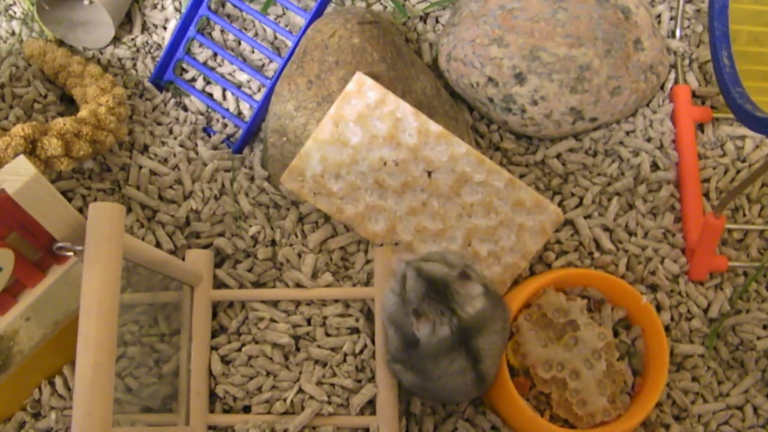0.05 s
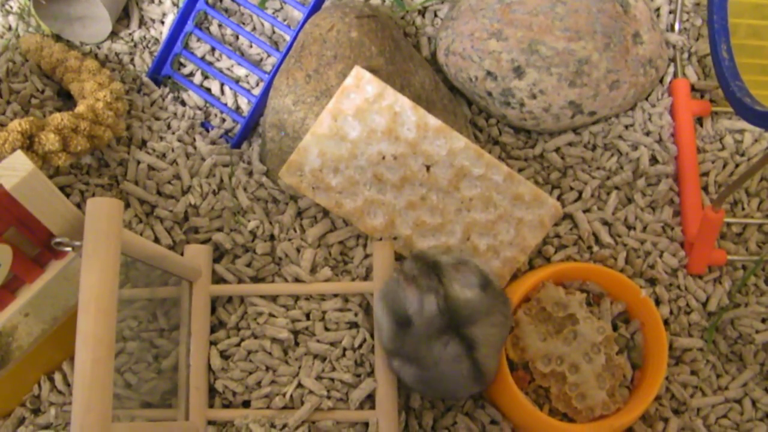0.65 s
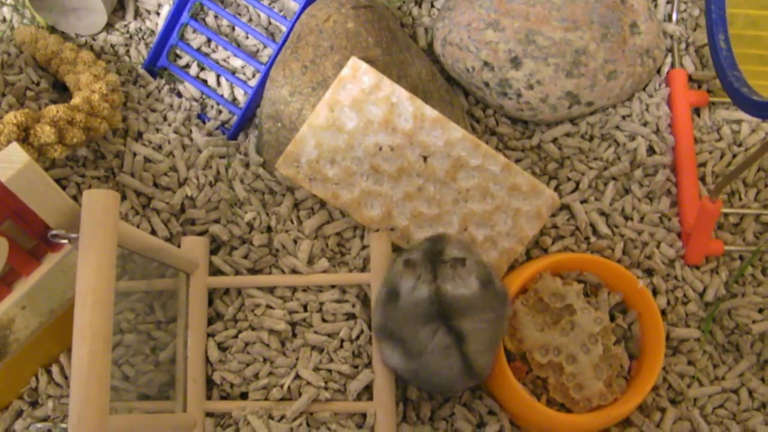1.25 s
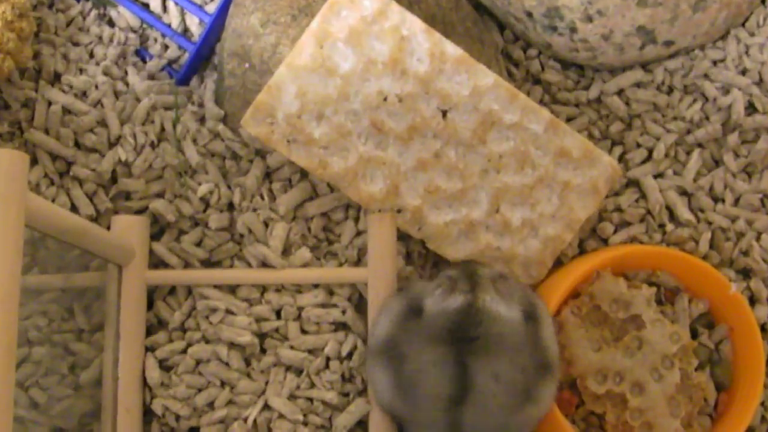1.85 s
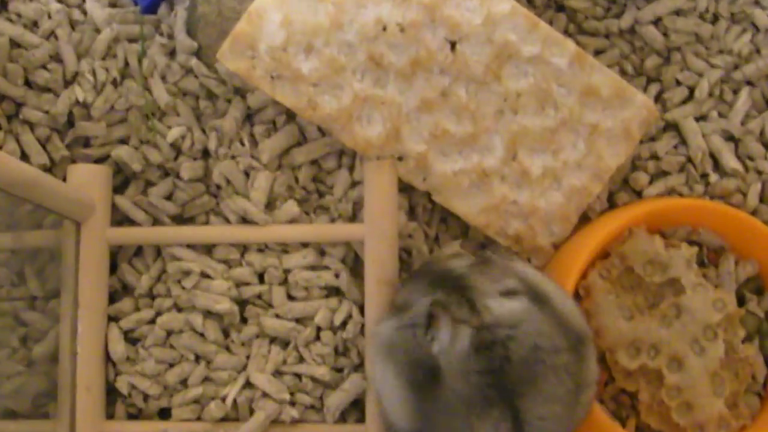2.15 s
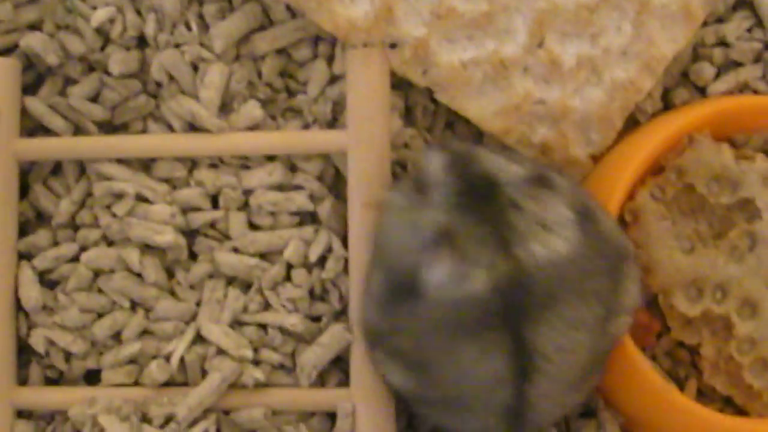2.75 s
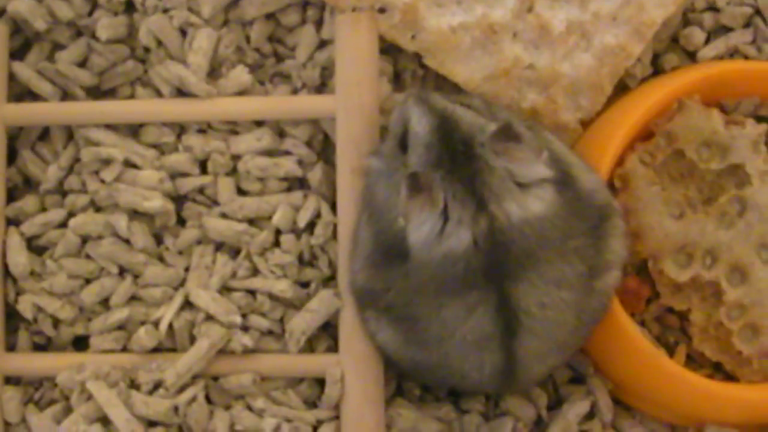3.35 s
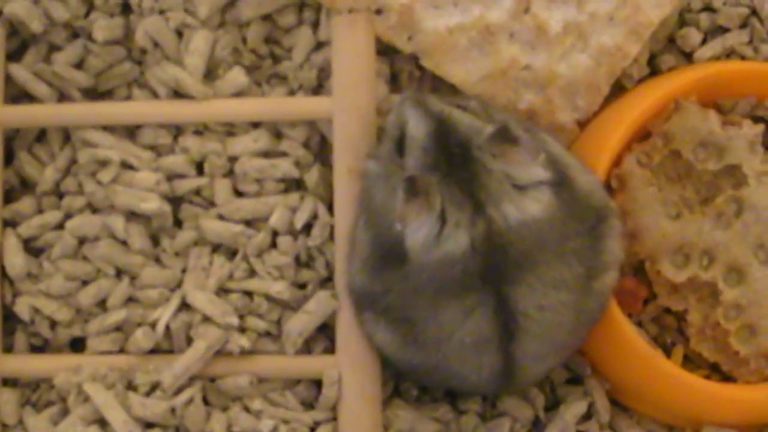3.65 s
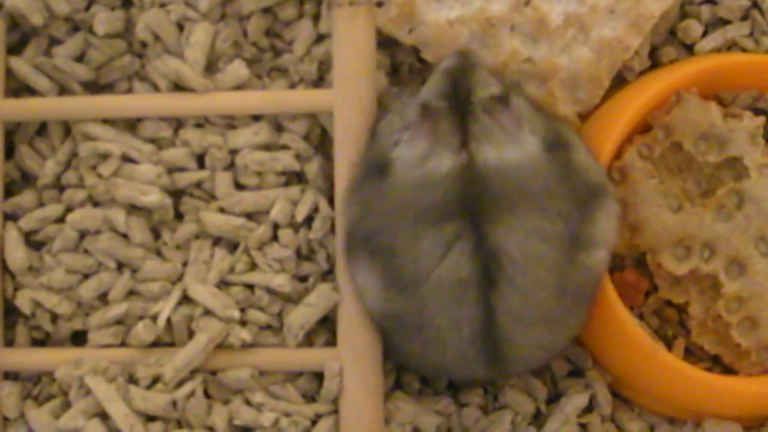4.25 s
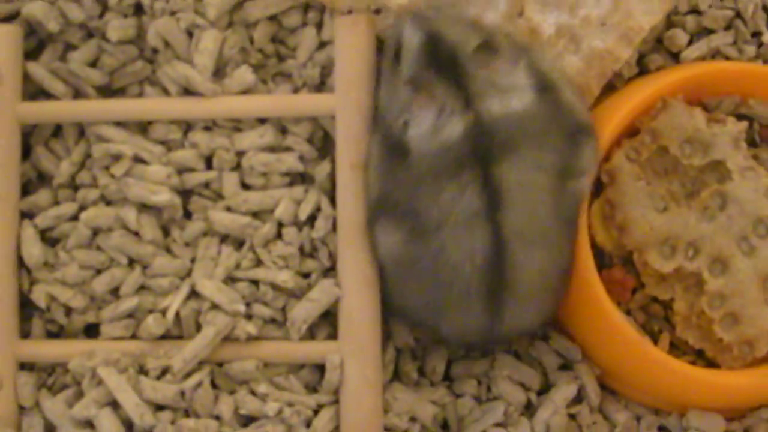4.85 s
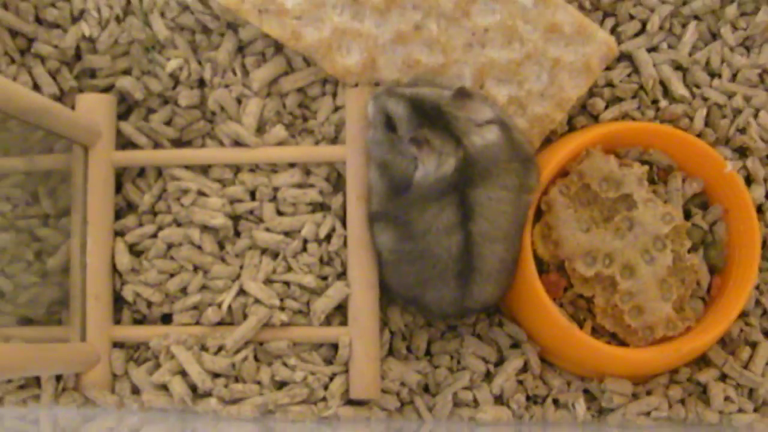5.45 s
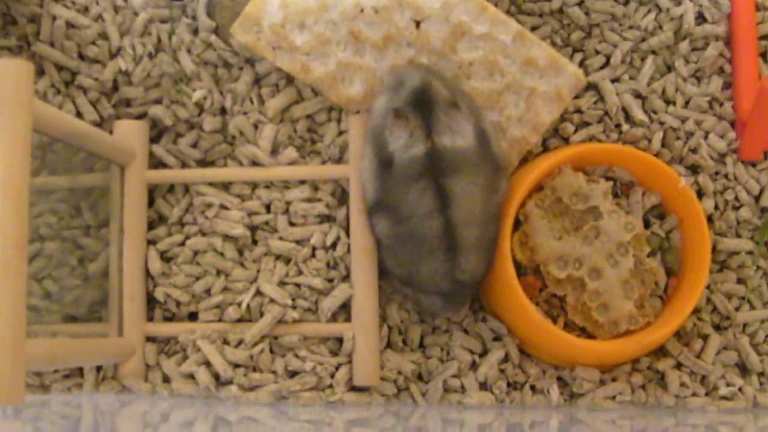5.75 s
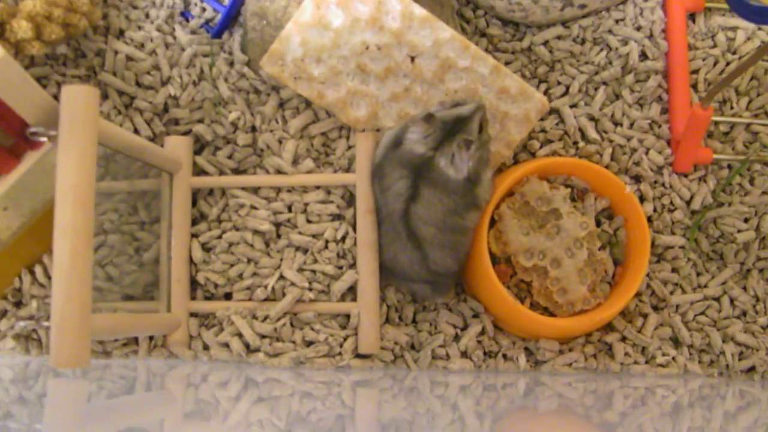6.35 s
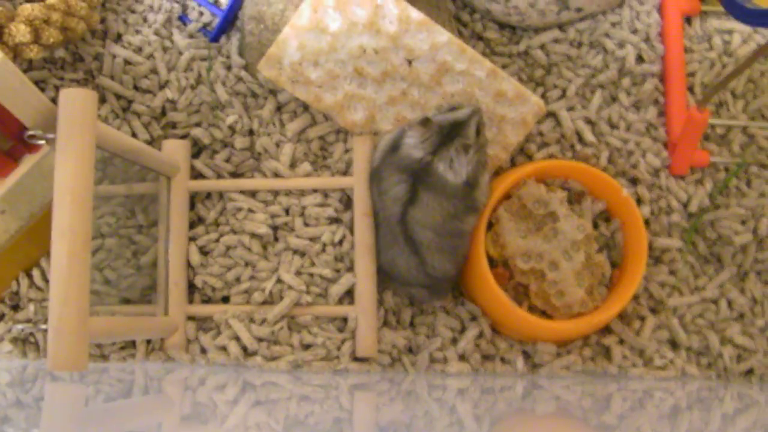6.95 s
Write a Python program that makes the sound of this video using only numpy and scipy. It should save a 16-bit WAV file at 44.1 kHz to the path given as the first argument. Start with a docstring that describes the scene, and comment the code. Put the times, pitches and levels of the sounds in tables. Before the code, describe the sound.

In a quiet room, a camera microphone sits close above a hamster. Steady hiss and faint, rapid lens ticking run throughout, and a heavy engine drones far outside. Paws bump and shuffle on pellet bedding, and a cracker snaps sharply between teeth, then again. The focus motor buzzes briefly. The engine, after two gear changes, fades back; soft shuffling continues, and the motor buzzes again at the end.

```python
"""A quiet room, camera microphone close above a dwarf hamster on pellet bedding. From the start the lens
ticks on every frame over the hiss, and a heavy engine drones far outside. Paws bump and shuffle; at 1.2 s
a cracker snaps between the teeth. The engine changes gear near 1.7 s, and the cracker snaps again around
2.6 s. At 3 s the focus motor buzzes through a run of steps. After a second gear change near 4 s the engine
drops back, the hamster shuffles on, and from 6.5 s the lens hunts again."""
import sys
import numpy as np
from scipy import signal
from scipy.fft import rfft, irfft, next_fast_len
from scipy.io import wavfile
from scipy.ndimage import uniform_filter1d

SR = 44100
rng = np.random.default_rng(int(sys.argv[2]) if len(sys.argv) > 2 else 0)


def master(y):
    """Save y as 16-bit WAV."""
    cut = np.clip(np.atleast_2d(y).T, -1, 1)
    pcm = np.round(cut * 32767)  # scale
    wavfile.write(sys.argv[1], SR, pcm.astype(np.int16))


N = 313551

FRAME_HZ, FIRST_TICK_S = 29.97, 0.01425
# long focus moves that rattle the lens carriage: (time [s], drive [dB], rattle [dB], travel [s])
LONG_MOVES = [(3.1324, -42, -35, 0.016), (3.152, -41.5, -46.5, .008), (3.194, -39.5, -38.5, 0.01),
              (3.26, -40, -44, 0.006), (3.287, -51, -39, 0.016), (3.3382, -38.5, -37.5, 0.017),
              (3.638, -41, -51, 0.019), (3.693, -41.5, -40, 0.0056), (6.4995, -33, -61.5, 0.011),
              (6.61, -39, -44, 0.0095), (6.655, -42, -40, 0.007), (6.7, -42, -43.5, 0.012),
              (6.7627, -38.5, -41, 0.0079), (6.795, -39, -43, 0.0065), (6.828, -43, -45, 0.014),
              (7.007, -42, -32, .012)]


def cracker_snaps():
    """Just under the microphone, a sharp break and a dying spray of fractures ring the cracker."""
    # breaks between the teeth: (time [s], level [dB], body relative to crack [dB], decay [s])
    snaps = [(1.2426, -19.5, -30, 0.00099), (2.5545, -28, 0.5, 0.0017), (2.5662, -41.5, 5.5, 0.0022),
             (2.6164, -31.5, 5, 0.0011), (2.6173, -19, -4, 0.0022)]
    # resonances of the brittle crack: (frequency [Hz], width [Hz], level [dB])
    crack_modes = [(3180, 730, -6.5), (3970, 690, -1), (5630, 530, 4.5), (6580, 540, 2), (8600, 900, -14),
                   (11400, 1600, -20.5), (14300, 2800, -27)]
    # resonances of the cracker's duller body: (frequency [Hz], width [Hz], level [dB])
    body_modes = [(403, 470, -14.5), (1060, 230, 0.5), (1780, 410, -5.5), (2220, 490, -6.5),
                  (3120, 200, -3)]
    crack, body = np.zeros((2, N))
    for s, db, body_db, decay in snaps:
        shape = blow(decay, tail_db=-15.5, tail_s=4.3 * decay)
        fractures = shape * rng.choice([-1, 1], len(shape))
        add(fractures, 0.0004, np.array([3.5]))   # the break itself
        add(crack, s, from_db(db) * fractures)
        add(body, s, from_db(db + body_db) * fractures)
    return ring(crack, crack_modes) + ring(body, body_modes)


def bumps_and_ticks():
    """Small knocks from the cage and the lens, each exciting one quickly damped resonance."""
    # Mostly paws and pellets on wood and bowl. At 3.927 s a lone bright tick near 6 kHz, probably a
    # focus motor step; at 7.015 s a low thud as the lens carriage sways after a long focus move.
    # (time [s], level [dB], pitch [Hz], width [Hz])
    knocks = [(0.075, -47, 2140, 1100), (.223, -43, 2100, 2600), (1.083, -49.5, 1940, 400),
              (1.382, -50, 1380, 1000), (1.685, -40.5, 609, 303), (1.689, -38, 4530, 4000),
              (1.78, -45, 3700, 750), (1.835, -44, 590, 280), (1.865, -43.5, 1600, 2180),
              (1.954, -47, 643, 1270), (2.2414, -41, 225, 393), (2.565, -36.5, 150, 131),
              (2.871, -46, 210, 500), (3.927, -36, 5830, 1180), (4.843, -50.5, 9000, 9000),
              (5.632, -48.5, 1700, 1400), (5.723, -47.5, 400, 1100), (6.699, -39, 400, 500),
              (6.7007, -34, 1090, 600), (6.871, -43, 686, 533), (7.015, -41, 286, 160)]
    out, shape = np.zeros(N), blow(decay_s=0.0038, tail_db=-13, tail_s=0.011)
    for s, db, hz, width in knocks:
        burst = shape * rng.standard_normal(len(shape))
        sound = resonate(resonate(burst, hz, width), hz, width)
        add(out, s, from_db(db) * rms_one(sound) * np.sqrt(np.mean(shape ** 2)))
    return out


def bedding():
    """Pellets rub and tick against each other under the paws, catching and slipping in little clumps."""
    # shuffles on the cage floor: (time [s], level [dB], length [s])
    shuffles = [(1.15, -53.5, 0.17), (1.35, -51.5, .12), (1.46, -45.5, 0.04), (1.57, -54.5, .063),
                (2.33, -51.5, 0.081), (3.855, -49, 0.072), (4.53, -57, 0.37), (4.828, -51.5, 0.028),
                (4.88, -52.5, 0.071), (4.945, -53, .076), (5.045, -49, 0.038), (5.54, -57.5, 0.3),
                (5.797, -52, 0.035), (5.838, -47.5, 0.045), (6.645, -45.5, 0.083)]
    # spectrum of rubbing pellets: (frequency [Hz], level [dB])
    pellet_colour = [(300, -3.5), (1200, -5.5), (2200, -7), (3200, -1), (4500, -0.5), (6000, 5.5),
                     (7000, -1), (7700, -8), (9000, -8), (12000, -16.5), (16000, -41)]
    clumps_db = 3.2 * rms_one(uniform_filter1d(rng.standard_normal(N), size=220))
    friction = grit(per_s=2600, spread_db=3.0) + 0.29 * rng.standard_normal(N)
    rubbing = from_db(np.minimum(clumps_db, 6)) * friction
    return swells(shuffles) * coloured(rubbing, pellet_colour)


def frames():
    """The times of the camera's frames."""
    return np.arange(FIRST_TICK_S, N / SR, 1 / FRAME_HZ)


def frame_ticks():
    """Inside the camera the lens drive is pulsed on every frame; the barrel rings a little after it."""
    out, tick = np.zeros(N), from_db(-44.5) * pip(hz=6135, length_s=0.00178, taper=0.34)
    for s in frames():
        add(out, s, tick)
    return out + from_db(4.0) * resonate(out, hz=7200, width_hz=270)


def focus_steps():
    """The long moves, and a plain step on each remaining frame of a run: (time [s], drive [dB])."""
    # runs in which the lens hunts for focus: (start [s], end [s], drive [dB])
    runs = [(3.01, 3.71, -39.5), (6.48, 7.11, -40)]
    lag_s, jitter_s, spread_db = 0.0076, 0.00065, 1.1
    moves = [(s, db) for s, db, _, _ in LONG_MOVES]
    due = frames() + lag_s
    plain = []
    for s, (late, strong) in zip(due, rng.standard_normal((len(due), 2))):
        free = all(abs(s - move) > 0.5 / FRAME_HZ for move, _ in moves)
        for start, end, db in runs:
            if free and start < s < end:
                plain.append((s + jitter_s * late, db + spread_db * strong))
    return moves + plain


def focus_motor():
    """Each step is a short whine; then the carriage moves, knocks and sways on its mount."""
    # lens barrel resonances: (frequency [Hz], width [Hz], level [dB])
    barrel_modes = [(282, 35, 4), (1080, 55, 7), (1790, 430, -10), (2383, 116, 1), (2782, 110, 7),
                    (3040, 84, 6.5), (3290, 160, 3), (3620, 180, 3.5), (4180, 150, -6), (4660, 110, 2.5),
                    (5280, 450, 1), (6100, 240, 3.5), (6920, 260, -1.5), (8300, 100, -12.5)]
    drive_hz, brake_hz, sway_hz, rasp_hz, rasp_width_hz = 5964, 5600, 287, 3680, 3000
    step_s, rattle_lag_s = 0.0035, 0.0038
    whine, knocks, hold, sway = np.zeros((4, N))
    t = clock(0.042)
    swing = np.sin(2 * np.pi * sway_hz * t) * np.exp(-t / 0.012) * (1 - np.exp(-t / 0.002))
    steps = focus_steps()
    for (s, db), (detune, brake, push) in zip(steps, rng.standard_normal((len(steps), 3))):
        length = step_s * np.exp(0.14 * push)
        end = s + length
        drive_pulse = pip(drive_hz * (1 + 0.0032 * detune), length, taper=0.34)
        brake_pulse = pip(brake_hz * (1 + 0.043 * detune), 0.0013, taper=0.82)
        add(whine, s, from_db(db) * drive_pulse)
        add(whine, end + 0.001, from_db(db + 2.0 + 0.47 * brake) * brake_pulse)
        add(knocks, end + 0.00178, from_db(db - 7.5) * blow(0.0029, tail_db=-30, tail_s=0.0076))
        add(hold, s, from_db(db - 10.5) * blow(0.012, tail_db=-28, tail_s=0.02))
        reach = (length / step_s) ** 3.6   # a longer push swings the carriage further
        add(sway, end + 0.0017, from_db(db - 9.0) * swing * reach)
    rattles = [(s + rattle_lag_s, db, travel) for s, _, db, travel in LONG_MOVES]
    for s, db, travel in rattles:
        add(knocks, s + travel, from_db(db - 24) * blow(0.011, tail_db=-2, tail_s=0.023))
    contacts = grit(per_s=5000, spread_db=2.0) * (knocks + swells(rattles))
    # the carriage's dry scrape, heard beside the barrel's ring
    rasp = resonate(resonate(contacts, rasp_hz, rasp_width_hz), rasp_hz, rasp_width_hz)
    rattle = ring(contacts, barrel_modes) + from_db(-2.5) * rasp
    # the holding current keeps the barrel sizzling between steps
    sizzle = hold * ring(rng.standard_normal(N), [(990, 190, -0.5), (5930, 46, 11.0)])
    return whine + rattle + sway + sizzle


def far_engine():
    """From far outside only the lowest orders pass the walls; load and coasting shift their balance."""
    # the engine climbs, sags at two gear changes, then cruises: (time [s], speed [turns/s])
    speed_curve = [(0.0, 28.1), (0.75, 30.3), (1.45, 32.2), (1.56, 29.8), (1.74, 25.2), (1.9, 28.8),
                   (2.06, 27.6), (3.81, 30.0), (3.93, 29.0), (4.1, 26.0), (4.25, 29.1), (5.3, 28.5)]
    # its loudness, which follows the load: (time [s], level [dB])
    load_curve = [(0.0, -48), (0.08, -44.5), (1.15, -40.5), (1.44, -43), (1.52, -51), (1.6, -43),
                  (1.68, -51), (1.88, -52.5), (2.0, -46), (3.66, -46.5), (3.96, -57.5), (4.1, -46),
                  (4.14, -58), (6.3, -62), (6.36, -57.5), (7.11, -61)]
    # harmonics of the shaft; off the throttle the third takes over:
    # (order, level at middling load [dB], rise with loudness [dB/dB], change when coasting [dB])
    orders = [(1, -77, .6, -5), (2, -51, 0.93, -11), (3, -52, 1.54, 6.5), (4, -54, 0.72, -2.5),
              (5, -59.5, 0.4, -2.5), (6, -70, 0.1, -5)]
    # the path through the walls and the room: (frequency [Hz], gain [dB])
    walls = [(30, 0), (51, -7), (58, 0), (66, 5), (83, -1.5), (95, 0), (112, 0.5), (128, -3.5), (140, 3.5),
             (160, -11.5), (190, 3)]
    middling_db, coast_turns_per_s2 = -47, 20
    speed, = in_time(speed_curve)
    loudness_db, = in_time(load_curve)
    shaft_angle = 2 * np.pi * np.cumsum(speed) / SR
    slowing = uniform_filter1d(-np.gradient(speed) * SR, size=SR // 20)
    coasting = np.clip(slowing / coast_turns_per_s2, 0, 1)
    wall_hz, wall_db = np.transpose(walls)
    lags_rad = 0.84 * rng.standard_normal(len(orders))   # nearly in step, so every firing throbs
    out = np.zeros(N)
    for (order, db, follows, coast_db), lag in zip(orders, lags_rad):
        source_db = db + follows * (loudness_db - middling_db) + coast_db * coasting
        fading_db = 1.2 * waver(every_s=0.21)   # each order comes and goes over the distance
        path_db = np.interp(order * speed, wall_hz, wall_db) + fading_db
        out += from_db(source_db + path_db) * np.cos(order * shaft_angle - lag)
    return np.sqrt(2) * out


def background():
    """Room tone with a faint appliance hum, microphone hiss and a far rush."""
    # spectrum of the room and microphone floor: (frequency [Hz], level [dB])
    room_colour = [(20, 2), (38, -8), (50, 8), (70, 9.5), (130, 5), (200, 1.5), (400, -2.5), (800, -3.5),
                   (1600, -7), (3000, -9.5), (4300, -10.5), (5000, -28), (8000, -17), (16000, -24.5)]
    # spectrum of the microphone hiss: (frequency [Hz], level [dB])
    hiss_colour = [(3000, -38), (5000, -11.5), (5500, -1.5), (5900, -7), (6400, -0.5), (6750, -12.5),
                   (7150, -3), (7600, -44), (8400, -16), (15500, -11)]
    # the far rush dies away after the second gear change: (time [s], level [dB])
    rush_curve = [(0, -59), (.7, -60), (1.5, -58.5), (1.9, -61), (3.6, -67.5), (4.2, -63.5), (7.11, -95)]
    # its spectrum: (frequency [Hz], level [dB])
    rush_colour = [(100, 0.5), (450, 2), (900, -8.5), (1600, -8), (2250, 0.5), (3000, -10), (5500, -4),
                   (8000, -25), (16000, -45)]
    rush_db, = in_time(rush_curve)
    hum = from_db(-75) * np.sin(2 * np.pi * 48 * np.arange(N) / SR)
    room = from_db(-57) * noise(room_colour)
    hiss = from_db(-62) * noise(hiss_colour)
    return hum + room + hiss + from_db(rush_db) * noise(rush_colour)


def from_db(db):
    """Decibels to gain."""
    return 10 ** (np.asarray(db) / 20)


def rms_one(x):
    """Scale to unit power."""
    return x / np.sqrt(np.mean(x ** 2) + 1e-20)


def in_time(rows):
    """Each column of a curve at every sample."""
    s, *columns = np.transpose(rows)
    return [np.interp(np.arange(N) / SR, s, c) for c in columns]


def clock(length_s):
    """Sample times of a short sound."""
    return np.arange(max(int(length_s * SR), 8)) / SR


def add(track, s, sound):
    """Mix a sound into a track at a time."""
    at = int(np.clip(s * SR, 0, N - 1))
    track[at:at + len(sound)] += sound[:N - at]


def coloured(x, points):
    """Give a signal a smooth spectrum; rms 1."""
    hz, db = np.transpose(points)
    size = next_fast_len(len(x))
    bins = np.maximum(np.fft.rfftfreq(size, 1 / SR), 1)
    gain = from_db(np.interp(np.log(bins), np.log(hz), db))
    return rms_one(irfft(rfft(x, size) * gain, size)[:len(x)])


def noise(points):
    """Steady noise of a given colour; rms 1."""
    return coloured(rng.standard_normal(N), points)


def resonate(x, hz, width_hz):
    """One resonance with gain 1 at its peak."""
    r = np.exp(-np.pi * width_hz / SR)
    feedback = [1, -2 * r * np.cos(2 * np.pi * hz / SR), r * r]
    return signal.lfilter(np.array([1, 0, -1]) * (1 - r * r) / 2, feedback, x + 1e-18)


def ring(x, modes):
    """Pass a signal through an object's resonances; white noise keeps roughly its power."""
    power = sum(from_db(2 * db) * np.pi * width / SR for hz, width, db in modes)
    ringing = sum((-1) ** k * from_db(db) * resonate(x, hz, width)
                  for k, (hz, width, db) in enumerate(modes))
    return ringing / np.sqrt(power)


def swells(rows):
    """A rounded swell for each row of (time [s], level [dB], length [s])."""
    out = np.zeros(N)
    for s, db, length in rows:
        add(out, s, from_db(db) * np.sin(np.linspace(0, np.pi, len(clock(length)))))
    return out


def blow(decay_s, tail_db, tail_s):
    """Envelope of a contact: it dies fast, leaving a brief, softer tail of echo."""
    t = clock(0.15)
    return (1 - np.exp(-t / 0.0001)) * (np.exp(-t / decay_s) + from_db(tail_db) * np.exp(-t / tail_s))


def pip(hz, length_s, taper):
    """A few cycles of a coil's drive tone, switched on and off."""
    t = clock(length_s)
    return np.sin(2 * np.pi * hz * t) * signal.windows.tukey(len(t), taper)


def grit(per_s, spread_db):
    """Tiny random contacts of uneven size; rms 1."""
    sizes = from_db(spread_db * np.minimum(rng.exponential(1, N), 4))
    return rms_one((rng.random(N) < per_s / SR) * rng.choice([-1, 1], N) * sizes)


def waver(every_s):
    """A slow random wander of spread about 1."""
    return np.interp(np.arange(N) / SR / every_s, np.arange(256), rng.standard_normal(256))


def scene():
    """One microphone: the hamster close below, the camera's own lens, the engine far outside."""
    close = cracker_snaps() + bumps_and_ticks() + bedding() + frame_ticks() + focus_motor()
    return (close + far_engine() + background())[None]


def record(dry):
    """The camera notches out a few narrow bands and cuts the top."""
    # the camera's notch filters: (frequency [Hz], width [Hz])
    notches = [(4830, 260), (7920, 440), (9650, 24)]
    cutoff_hz = 15800
    for hz, width_hz in notches:
        dry = signal.lfilter(*signal.iirnotch(hz, hz / width_hz, fs=SR), dry)
    return signal.sosfilt(signal.ellip(10, 0.1, 70, cutoff_hz, fs=SR, output="sos"), dry)


dry = scene()
out = record(dry)
master(out)
```